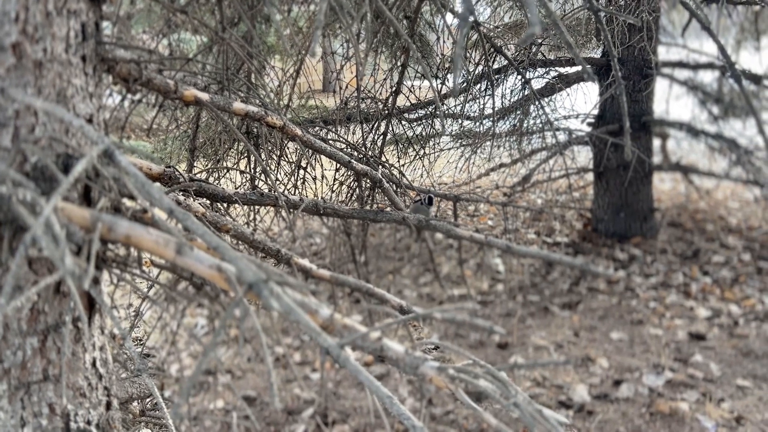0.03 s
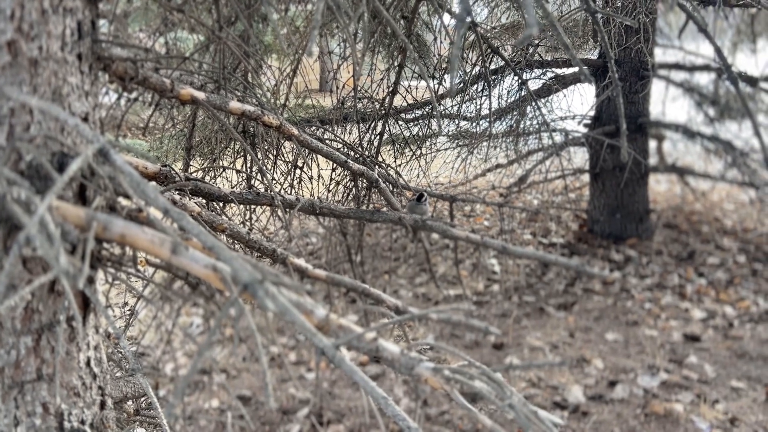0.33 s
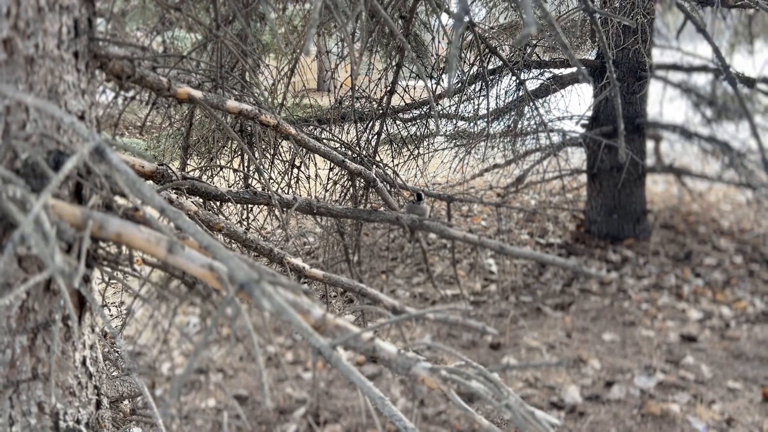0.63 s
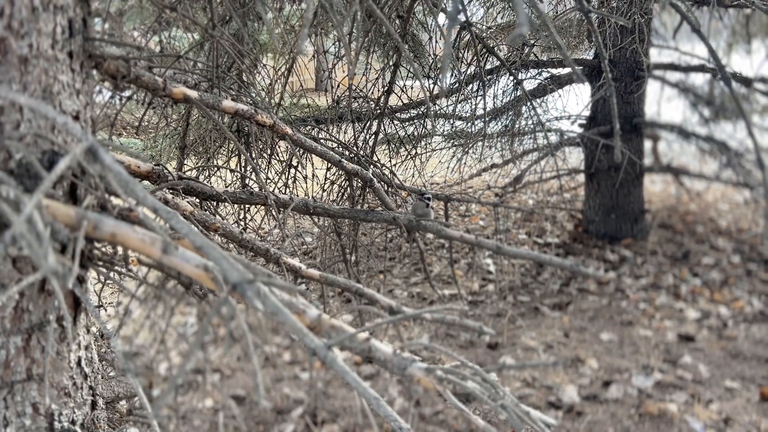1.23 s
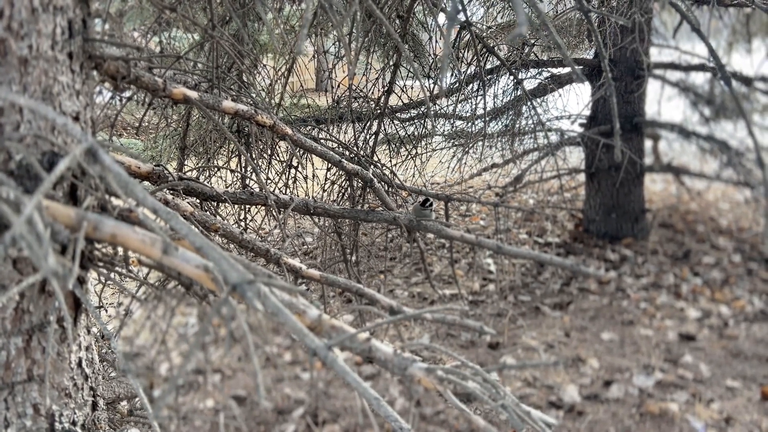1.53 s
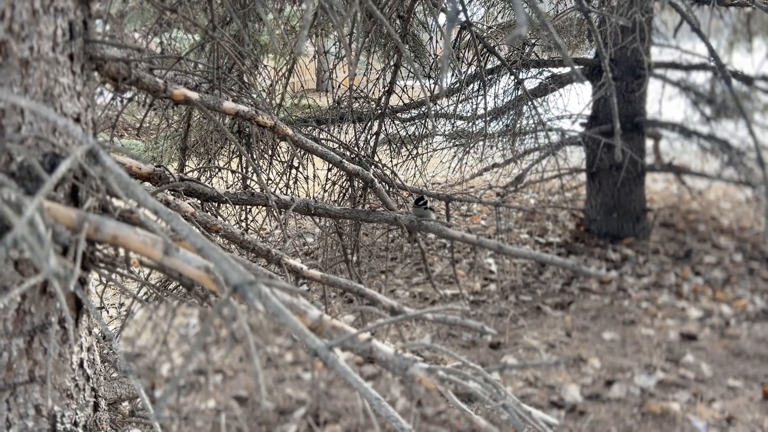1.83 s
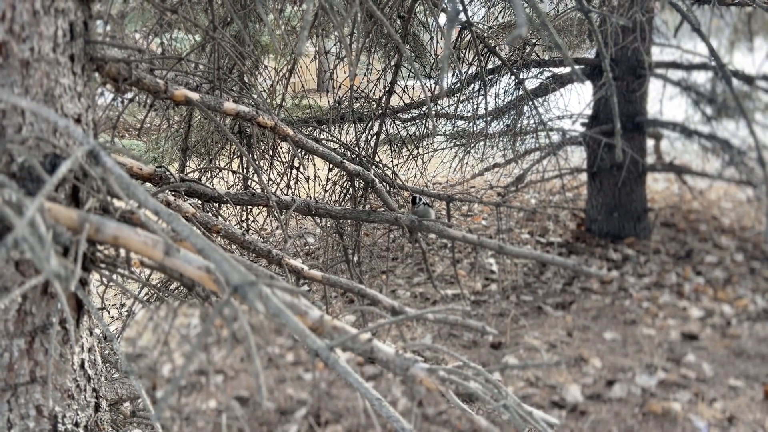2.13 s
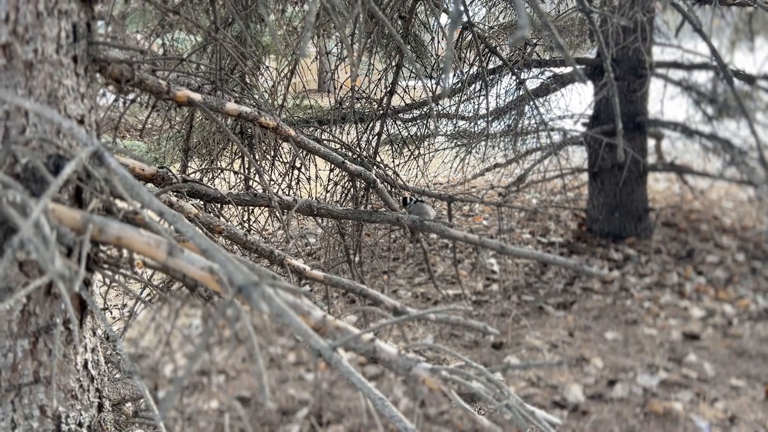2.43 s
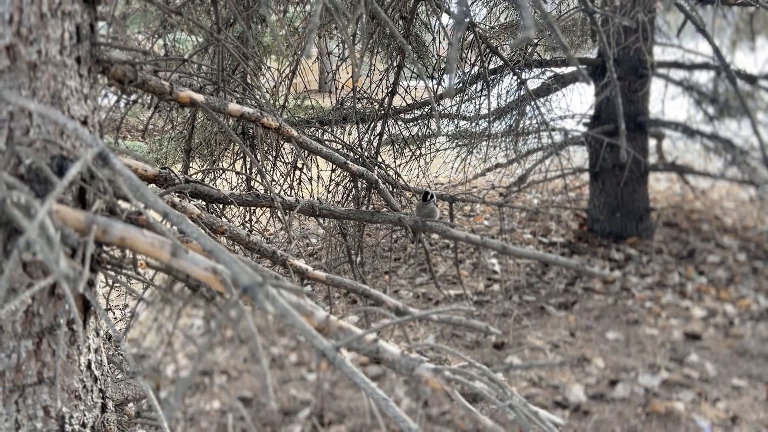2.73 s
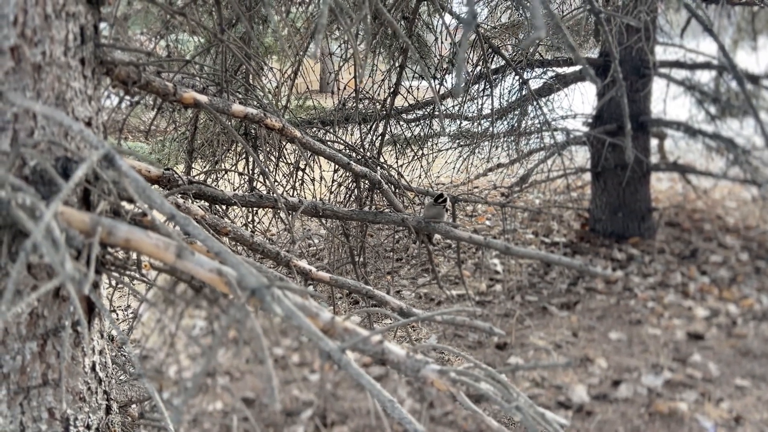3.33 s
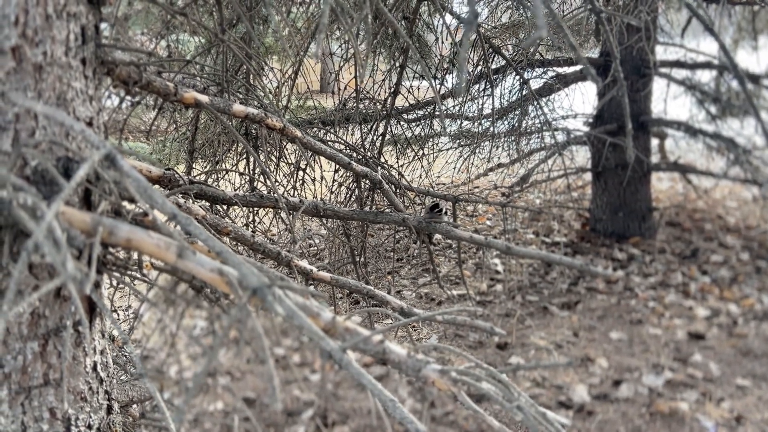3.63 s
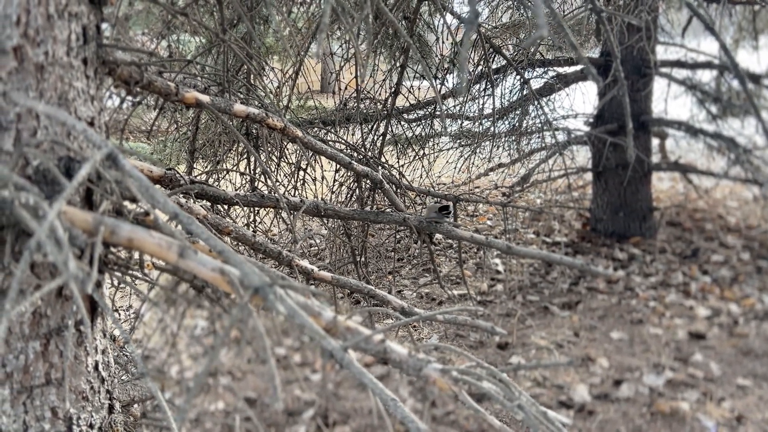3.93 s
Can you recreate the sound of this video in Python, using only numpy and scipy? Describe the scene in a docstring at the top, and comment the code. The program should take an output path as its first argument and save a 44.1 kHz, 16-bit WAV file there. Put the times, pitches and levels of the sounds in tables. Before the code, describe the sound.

A small woodpecker picks at a dead branch a few metres away among conifers, with light, irregular taps that snap and crackle. Faint wind, a distant traffic-like rumble and far songbirds lie behind, and a lower bird calls near the end.

```python
"""A small woodpecker picks at a dead branch a few metres away among conifers.
Each peck briefly crushes fibres: they snap and crackle, and the branch knocks. Thin twigs knock higher,
bark clicks and crumbs crackle; twigs and trunks scatter the sound. Songbirds and a lower caller whistle
far off, over faint wind and a distant rumble and hum like traffic."""
import sys
import numpy as np
from scipy import signal
from scipy.fft import rfft, irfft, next_fast_len
from scipy.io import wavfile
from scipy.ndimage import uniform_filter1d

SR = 44100
rng = np.random.default_rng(int(sys.argv[2]) if len(sys.argv) > 2 else 0)


def generate_wav(sig):
    """Save sig (samples, or channels by samples) to the path in sys.argv[1] as 16-bit PCM at SR."""
    pcm = np.round(np.clip(np.atleast_2d(sig).T, -1, 1) * 32767).astype(np.int16)
    wavfile.write(sys.argv[1], SR, pcm)


N = 176400

# Beak blows: start_s, knock_db, snap_db, crackle_db, snap_hz, contact_ms
PECKS = [(0.2539, -64, -57, -62, 7340, 1.2), (0.4553, -67.5, -63, -56, 6660, 0.17),
         (0.569, -58, -56.5, -56.5, 7700, 2.4), (0.6033, -83, -80, -60, 6360, 0.58),
         (0.8266, -58, -54.5, -86, 6600, 2.4), (0.8916, -73, -82, -61, 6200, 0.36),
         (1.039, -56, -42, -64, 6500, 0.95), (1.177, -47, -42, -40, 6700, 1.05),
         (1.48, -65.5, -56, -57, 7350, 1.3), (1.6745, -72, -51.5, -68, 8400, 0.85),
         (1.6799, -64.5, -64, -58, 6060, 1.4), (1.704, -74, -73, -82, 7400, 1.8),
         (1.796, -78, -71, -65, 6600, 2.0), (1.8088, -71, -71, -72, 6450, 0.57),
         (2.099, -61, -52, -58, 5030, 0.49), (2.123, -71, -57, -63, 8300, 1),
         (2.135, -65, -66, -59, 7400, 2.2), (2.2367, -71, -70, -78, 5000, 2),
         (2.3619, -61, -60, -58, 5900, 1.35), (2.412, -81, -61.5, -56.5, 7060, 3.3),
         (2.6506, -66, -71, -71.5, 5430, 0.45), (2.658, -57, -52, -49.5, 6300, 0.65),
         (2.9143, -54, -47, -41, 7400, 0.36), (3.0442, -55, -54.5, -46, 6400, 1.5),
         (3.0862, -75, -73, -62, 8630, 0.32), (3.4334, -47.5, -40.5, -42.5, 6700, 0.9),
         (3.562, -59.5, -52.5, -53, 5900, 1.3), (3.6753, -64.5, -50.5, -49.5, 7600, 1.2),
         (3.879, -55.5, -53.5, -56.5, 6560, 1.6)]
# Crackle colour, including the recorder's notch near 10 kHz: freq_hz, gain_db
CRACKLE_COLOUR = [(1000, -23.5), (2500, -0.5), (4000, -3), (6500, 2.5), (8500, 3), (9800, -7), (11500, 0.5),
                  (14500, 0.5), (16500, -13.5)]
BURST_GAIN = np.sqrt(SR / 200)  # unit energy to unit rms over 5 ms


def undb(db):
    """Decibels to gain."""
    return 10 ** (np.asarray(db) / 20)


def unit(x):
    """Scale to unit energy."""
    return x / np.sqrt(np.sum(x ** 2, axis=-1, keepdims=True) + 1e-30)


def curve(f, hz, values):
    """Interpolate over log frequency."""
    return np.interp(np.log(f + 1), np.log(hz), values)


def walk(rate_hz):
    """Smooth random drift, spread near 1."""
    k = int(SR / rate_hz)
    steps = np.repeat(rng.standard_normal(N // k + 1), k)
    return 1.3 * uniform_filter1d(uniform_filter1d(steps, k), k)[:N]


def band(x, lo_hz, hi_hz, order=2):
    """Band-pass."""
    return signal.sosfilt(signal.butter(order, [lo_hz, hi_hz], "band", fs=SR, output="sos"), x)


def colour(x, hz, db):
    """Filter by a breakpoint spectrum."""
    size = next_fast_len(len(x) + 512)
    f = np.arange(size // 2 + 1) * SR / size
    return irfft(rfft(x, size) * undb(curve(f, hz, db)), size)[:len(x)]


def fade(t, t60_s):
    """Exponential decay."""
    return np.exp(-np.log(1000) * t / t60_s)


def add(out, x, start_s):
    """Mix x into out."""
    i = int(round(start_s * SR))
    a, b = max(i, 0), min(i + x.shape[-1], N)
    if b > a:
        out[..., a:b] += x[..., a - i:b - i]


def from_right(x, lag_ms=0.1486):
    """Sound reaches the left microphone later."""
    f = np.arange(len(x) // 2 + 1) * SR / len(x)
    left = irfft(rfft(x) * np.exp(-2j * np.pi * f * lag_ms / 1000), len(x))
    return np.array([left, x])


def echo(x, t60_s, onset_s=0.0045, clump_db=0):
    """Diffuse echoes, uncorrelated left and right."""
    t = np.arange(SR // 3) / SR
    reflections = rng.standard_normal((2, len(t))) * undb(clump_db * walk(460)[:len(t)])
    response = unit(reflections * fade(t, t60_s) * (1 - np.exp(-t / onset_s)))
    return signal.fftconvolve(x[None], response, axes=1)[:, :N]


def scatter(x):
    """Quick echoes off near twigs, then a longer wash from trunks."""
    # Echo colour, including the recorder's notch near 9 kHz: freq_hz, early_db, late_db
    echo_colour = [(696, 10, -9), (2000, -4.5, -6.5), (4630, -6, -15.5), (6800, -12.5, -26),
                   (8150, -14.5, -23), (9200, -24.5, -28), (10800, -12.5, -29), (14500, -13, -27),
                   (16200, -9.5, -28.5)]
    hz, early_db, late_db = np.array(echo_colour).T
    late = colour(x, hz, late_db)
    trunks = echo(band(late, 300, 9000), t60_s=0.26, clump_db=3)
    trunks += echo(band(late, 9000, 15500), t60_s=0.45, clump_db=3)
    twigs = echo(colour(x, hz, early_db), t60_s=0.035, onset_s=0.0022)
    return twigs + trunks


def diffused(x):
    """A blow radiates in all directions, so its echoes carry only its broad colour."""
    power = uniform_filter1d(abs(rfft(x)) ** 2, size=120)
    pulse = irfft(np.sqrt(np.maximum(power, 0)))
    return np.roll(pulse, 48)[:256]


def rumble_and_wind(level_db=-35.5, flicker_db=1):
    """Centred rumble and wide, soft wind in the needles; each octave wavers."""
    # Background spectrum: freq_hz, density_db, side_minus_mid_db
    air_spectrum = [(22.2, -41, -15), (43.2, -10, -21.5), (51.8, -2.5, -20), (77.5, 2, -20),
                    (126, -7.5, -14.5), (188, -15, -10.5), (314, -17, -11), (474, -22, -7.5),
                    (696, -27, -2.5), (1140, -45.5, 5), (1596, -47, 2.5), (1953, -59, 0.5),
                    (3320, -70, 2.5), (4350, -70.5, -2.5), (5800, -75, 0), (8900, -79, -1.5),
                    (11700, -86.5, 4.5), (16000, -92.5, 0.5)]
    hz, db, side_db = np.array(air_spectrum).T
    f = np.arange(N // 2 + 1) * SR / N
    gain = undb(curve(f, hz, db)) * np.minimum(f / hz[0], 1) ** 2
    mid, side = rfft(rng.standard_normal((2, N))) * gain / np.sqrt(np.mean(gain ** 2))
    stereo = mid + np.array([[1], [-1]]) * side * undb(curve(f, hz, side_db))
    octave = np.log2(np.maximum(f, 20) / 20)
    bands = (irfft(stereo * np.maximum(1 - abs(octave - k), 0), N) for k in range(11))
    return undb(level_db) * sum(x * undb(flicker_db * walk(7.37)) for x in bands)


def engine_hum(waver_db=2, wander=0.0153):
    """Far engine tones, drifting in level and pitch."""
    # Engine tones: pitch_hz, level_db
    tones = [(80.5, -45), (91, -45.5), (114, -48.5), (217, -58.5), (275, -59)]
    out = np.zeros(N)
    for hz, db in tones:
        amplitude = np.sqrt(2) * undb(db + waver_db * walk(2.82))
        pitch_hz = hz * (1 + wander * walk(4))
        out += amplitude * np.sin(2 * np.pi * np.cumsum(pitch_hz) / SR)
    return out


def arched(length_s, hz, sag, arch=0.072):
    """Pitch line: slides up, holds with a tilt, drops away."""
    u = np.linspace(-1, 1, int(length_s * SR))
    return hz * (1 - arch * u ** 4 - sag * u / 2)


def whistle(pitch_hz, waver=0.013, rasp=0.022, flutter_db=3.5):
    """A fluttering bird note that swells and dies, roughened by quick tremors."""
    n = len(pitch_hz)
    rough_hz = pitch_hz * (1 + waver * walk(150)[:n] + rasp * walk(900)[:n])
    swell = (1 - np.linspace(-1, 1, n) ** 2) ** 0.38
    flutter = undb(flutter_db * walk(120)[:n])
    return np.sqrt(2) * swell * flutter * np.sin(2 * np.pi * np.cumsum(rough_hz) / SR)


def far_birds(second_voice_ratio=1.19, twitter_db=-92):
    """Two-voiced phrases, random twitter and a run of lower calls, blurred by the trees."""
    # Songbird phrases: level_db, second_voice_db, pitch line of (time_s, pitch_hz)
    phrases = [(-70.5, -9, [(-.02, 3280), (.035, 3830), (.065, 3320), (.085, 2790)]),
               (-73.5, -29, [(.615, 3550), (.642, 3410), (.667, 2520), (.684, 3390), (.71, 3320)]),
               (-80, -18, [(1.06, 2400), (1.14, 2650)]), (-74.5, -5, [(1.15, 3000), (1.18, 3300),
               (1.215, 3100), (1.285, 2995)]), (-75, -4, [(2.845, 2330), (2.878, 3020), (2.915, 3144),
               (2.975, 2900)])]
    # Lower bird's calls: start_s, length_s, pitch_hz, level_db
    low_calls = [(3.70, 0.066, 1833, -58), (3.77, 0.075, 1830, -57), (3.841, 0.122, 1832, -58.5),
                 (3.963, 0.077, 1730, -49.5)]
    songs, calls = np.zeros((2, N))
    for db, second_db, line in phrases:
        time_s, hz = np.array(line).T
        pitch_hz = np.interp(np.arange(time_s[0], time_s[-1], 1 / SR), time_s, hz)
        voices = whistle(pitch_hz) + undb(second_db) * whistle(pitch_hz * second_voice_ratio)
        add(songs, undb(db) * voices, time_s[0])
    for when, height, slope in rng.random(size=(22, 3)):
        pitch_hz = arched(length_s=0.08, hz=2300 + 2400 * height, sag=(slope - 0.5) / 2)
        add(songs, undb(twitter_db) * whistle(pitch_hz), when * N / SR)
    for start_s, length_s, hz, db in low_calls:
        note = whistle(arched(length_s, hz, sag=0.029), waver=0.016, rasp=0.012)
        add(calls, undb(db) * note, start_s)
    direct = undb(-5.5) * songs + undb(-9.5) * calls
    return direct + undb(-4) * echo(songs + calls, t60_s=0.32)


def crumbs(grains_per_s=900, level_db=-68.5, t60_s=0.12):
    """Crumbs of rotten wood crackle after each peck, a little louder after hard ones."""
    t, power = np.arange(SR // 5) / SR, np.zeros(N)
    for start_s, _, snap_db, *_ in PECKS:
        amplitude = undb(level_db + 0.19 * (snap_db + 55))
        add(power, (amplitude * fade(t, t60_s)) ** 2, start_s)
    grains = rng.standard_normal((2, N)) * (rng.random((2, N)) < grains_per_s / SR)
    crackle = np.array([unit(colour(side, *np.array(CRACKLE_COLOUR).T)) for side in grains])
    return np.sqrt(power * N) * crackle


def bark_clicks(clicks_per_s=1000, spread_db=6):
    """Showers of bark clicks; the three shortest are faint single pecks."""
    # Showers and faint pecks: start_s, length_s, level_db
    bursts = [(0.258, 0.075, -77.5), (.575, .05, -81), (0.842, 0.11, -81.5), (0.965, 0.0061, -77.5),
              (1.038, .06, -79), (1.477, 0.045, -77), (1.673, 0.042, -76), (1.788, 0.034, -74),
              (2.118, 0.1, -87), (2.523, 0.0051, -79.5), (2.646, 0.11, -83), (3.387, 0.0045, -73.5),
              (3.873, .05, -72)]
    clicks = (rng.random(N) < clicks_per_s / SR) * rng.standard_normal(N)
    clicks *= undb(spread_db * np.minimum(rng.exponential(size=N), 4))
    crackle = colour(clicks, *np.array(CRACKLE_COLOUR).T)
    direct = np.zeros(N)
    for start_s, length_s, db in bursts:
        i, n = int(start_s * SR), int(length_s * SR)
        burst = unit(crackle[i:i + n] * np.sqrt(np.linspace(1, 0, n)))
        add(direct, undb(db) * np.sqrt(n) * burst, start_s)
    return from_right(direct) + undb(10) * scatter(direct)


def twig_knocks(width_hz=750, crack_db=-8):
    """Short, higher-pitched knocks of the beak on thin twigs."""
    # Pecks on twigs: start_s, level_db, pitch_hz, length_ms
    twig_pecks = [(0.9356, -68.5, 4700, 3.4), (1.013, -60.5, 2150, 2), (1.8075, -57, 2600, 2),
                  (1.982, -70, 4050, 5.6), (2.014, -57, 3850, 2.1), (2.0976, -46.5, 2950, 0.51),
                  (3.0465, -63, 3150, 1.7)]
    t, direct = np.arange(SR // 16) / SR, np.zeros(N)
    for start_s, db, hz, length_ms in twig_pecks:
        age = t * 1000 / length_ms
        contact = rng.standard_normal(len(t)) * age * np.exp(-2 * age)
        ring = unit(band(contact, hz - width_hz / 2, hz + width_hz / 2))
        crack = undb(crack_db) * unit(band(contact, 2000, 7000))
        add(direct, BURST_GAIN * undb(db) * (ring + crack), start_s)
    return from_right(direct) + 0.5 * scatter(direct)


def knock(t, age, spread_db=1.5, detune=0.015, stereo_cycles=0.29, crunch_db=-16):
    """The branch rings, differently at each spot, over the dull crunch of soft dead wood."""
    # Branch modes: freq_hz, level_db, t60_s
    modes = [(543, 9, .035), (894, -2, .034), (1086, 0, 0.054), (1400, -9, 0.015), (1713, -1, 0.036),
             (2210, 3, 0.024), (2817, 3, 0.015), (3240, 1.5, 0.018), (4440, 3, 0.017)]
    side_cycles = stereo_cycles * np.array([[0.5], [-0.5]])
    ring = np.zeros((2, len(t)))
    for hz, db, t60_s in modes:
        strength, tuning, phase, skew = rng.standard_normal(4)
        cycles = hz * (1 + detune * tuning) * t + phase + skew * side_cycles
        ring += undb(db + spread_db * strength) * np.sin(2 * np.pi * cycles) * fade(t, t60_s)
    crunch = band(rng.standard_normal(len(t)) * fade(t, t60_s=0.0038), 850, 3800)
    push = 1 - np.exp(-age ** 2)
    return unit(unit(ring * push) + undb(crunch_db) * unit(crunch * push))


def peck(knock_db, snap_db, crackle_db, snap_hz, contact_ms, width_hz=2380):
    """The beak crushes fibres: the spot snaps, splinters crackle, the branch knocks."""
    t = np.arange(SR // 16) / SR
    age = t * 1000 / contact_ms
    crush = rng.standard_normal((3, len(t))) * age * np.exp(-age / 0.43)
    fibres = unit(band(crush[0], snap_hz - width_hz / 2, snap_hz + width_hz / 2))
    splinters = undb(-7) * unit(band(crush[1], 4600, 11000))
    snap = undb(snap_db - 1) * unit(fibres + splinters)
    crackle = undb(crackle_db - 4.5) * unit(band(crush[2], 9900, 14800, order=3))
    return BURST_GAIN * (undb(knock_db + 4) * knock(t, age) + from_right(snap + crackle))


def woodpecker():
    """Every peck on the branch with its echoes."""
    out = np.zeros((2, N))
    for start_s, *settings in PECKS:
        blow = peck(*settings)
        add(out, blow, start_s)
        add(out, scatter(diffused(blow[1])), start_s)
    return out


def scene():
    """The woodpecker in front of the woodland."""
    background = rumble_and_wind() + engine_hum() + far_birds()
    return background + woodpecker() + twig_knocks() + crumbs() + bark_clicks()


def record(dry, cutoff_hz=16300):
    """The recorder cuts the top."""
    return signal.sosfilt(signal.ellip(8, 0.2, 70, cutoff_hz, fs=SR, output="sos"), dry)


dry = scene()
out = record(dry)
generate_wav(out)
```